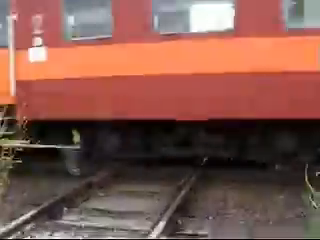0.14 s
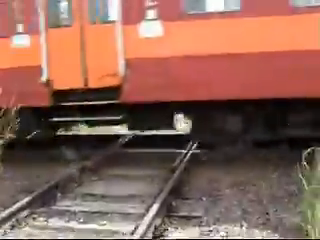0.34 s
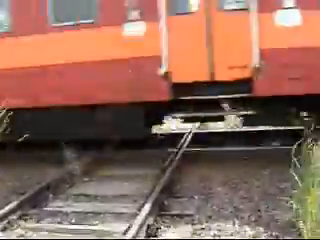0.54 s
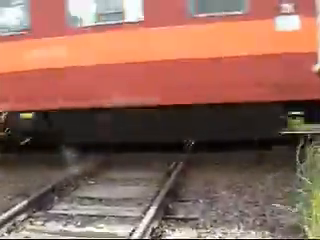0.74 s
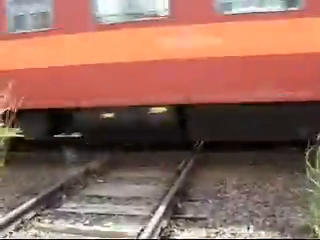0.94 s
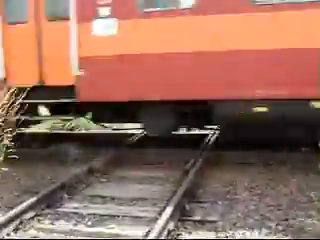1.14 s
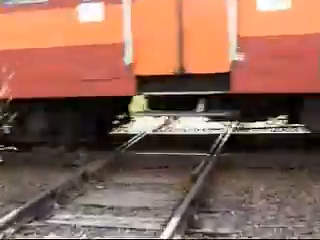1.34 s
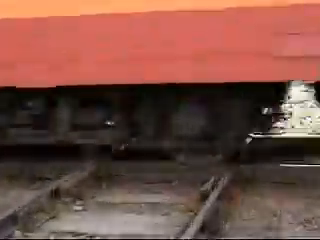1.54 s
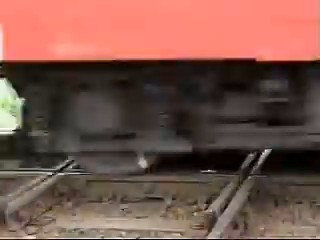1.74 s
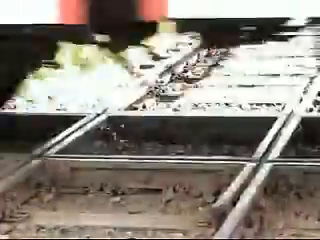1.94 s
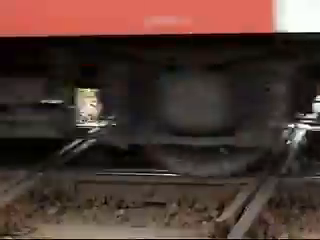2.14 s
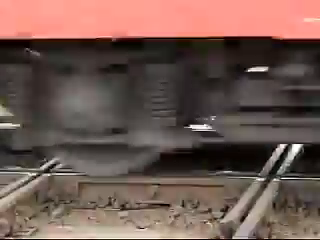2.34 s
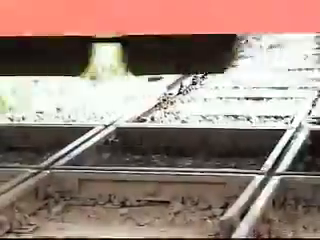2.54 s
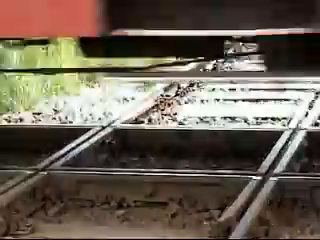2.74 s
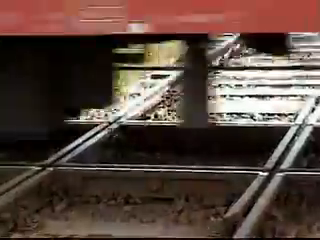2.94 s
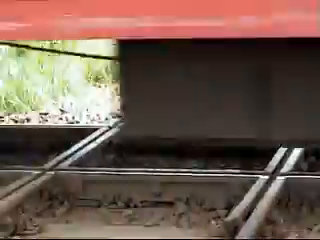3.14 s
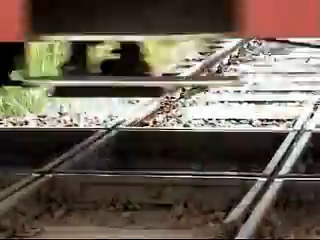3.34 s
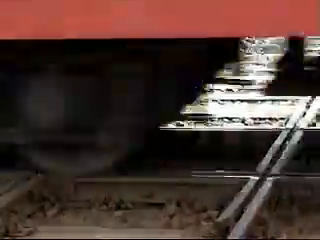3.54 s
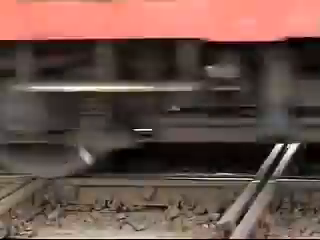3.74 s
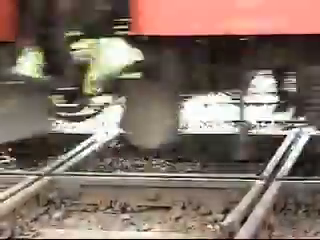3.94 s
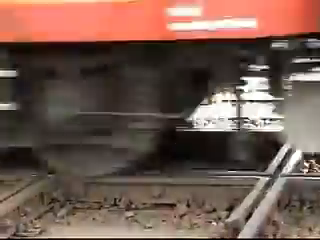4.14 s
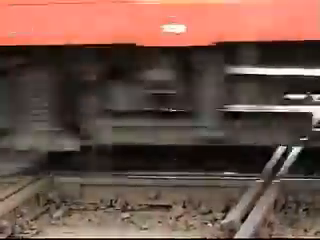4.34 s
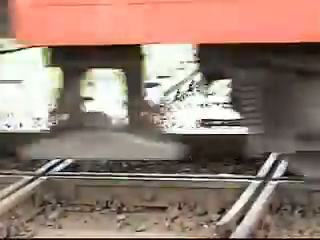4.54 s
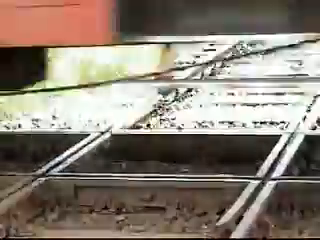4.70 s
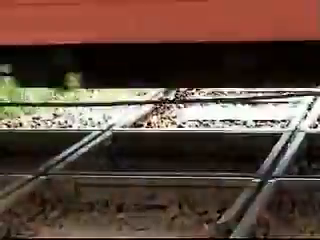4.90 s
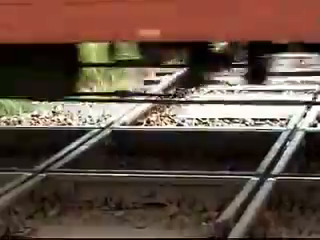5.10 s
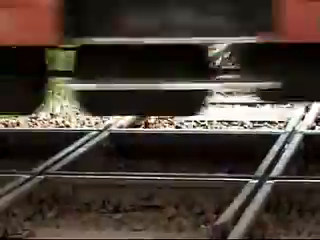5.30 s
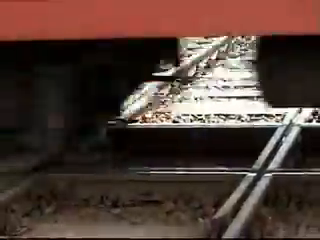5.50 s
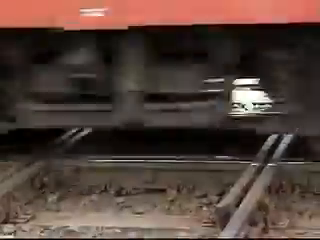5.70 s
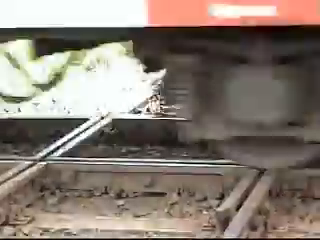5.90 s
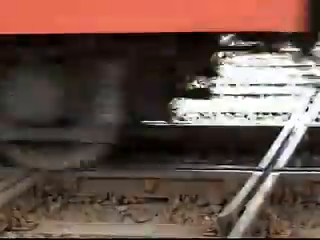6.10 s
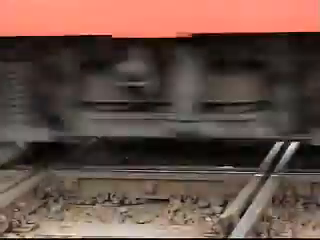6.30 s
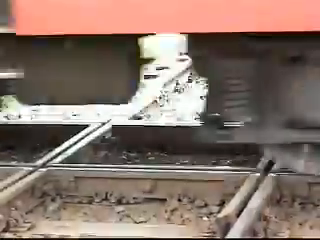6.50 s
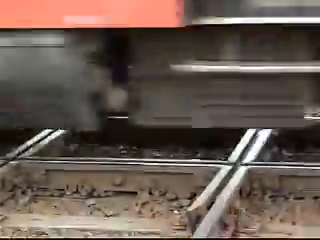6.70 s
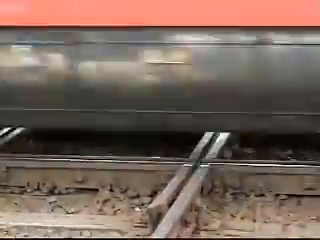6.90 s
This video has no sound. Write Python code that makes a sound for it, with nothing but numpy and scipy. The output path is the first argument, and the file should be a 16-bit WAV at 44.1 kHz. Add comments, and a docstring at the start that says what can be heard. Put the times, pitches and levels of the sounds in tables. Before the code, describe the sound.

Close to the track outdoors, passing passenger coaches make a continuous low rumble while the rails roar, swelling as each wheel nears. Groups of hard double knocks come about every two seconds as the wheels slam over crossed rails, each blow clanging and ringing briefly. Duller rail joint clonks surround them. Near the end, equipment under a coach hums for a moment as the clatter goes on.

```python
"""Rumble, roar and sharp steel knocks: an electric passenger train rolls over a nearby track crossing.
At each of two crossed rails, a wheel drops into a gap with a knock and a thud, slams onto the far edge
and rings on. Every bogie (a frame with two axles) also clonks over a rail joint before and after.
The rails roar as each wheel nears, the coaches rumble in between, and a short hum passes at the end."""
import sys
import numpy as np
from scipy import signal
from scipy.fft import rfft, irfft, next_fast_len
from scipy.io import wavfile
from scipy.ndimage import uniform_filter1d

SR = 44100
rng = np.random.default_rng(int(sys.argv[2]) if len(sys.argv) > 2 else 0)


def generate_wav(signal):
    """Clip the signal to [-1, 1] and save it as 16-bit WAV at the path in sys.argv[1]."""
    frames = np.transpose(np.atleast_2d(signal))
    scaled = np.clip(frames, -1, 1) * 32767
    pcm = np.round(scaled).astype(np.int16)
    wavfile.write(sys.argv[1], SR, pcm)


N = 306495

# One row per axle, a bogie's front and rear in turn: (time at gap 1 [s], time at gap 2 [s],
# knock 1 [dB], knock 2 [dB], flight over gap 1 [s], flight over gap 2 [s], clonk [dB], frame boom [dB],
# wheel ring [dB], fade time stretch [factor], ping pitch [Hz], ping level [dB], closest roar [dB])
AXLES = [(-0.085, 0.06, -12, -16, 0.014, 0.0086, -7, -21, -45, 1.17, 2610, -25, -27.5),
         (0.19, 0.335, -12, -8, 0.015, 0.006, -11, -15, -39, 0.99, 4005, -34, -32),
         (1.491, 1.628, -8.5, -16, 0.016, 0.008, -10, -10.5, -42, 1.08, 3460, -44, -28),
         (1.756, 1.899, -7, -5, 0.013, 0.002, -10.5, -18.5, -39, 1.12, 4010, -37, -30),
         (2.101, 2.237, -13, -6, 0.014, 0.010, -13, -23, -27.5, 1.07, 3680, -31, -34.5),
         (2.361, 2.502, -6.5, -7.5, 0.013, 0.009, -13, -23, -35, 1.1, 2713, -34, -34.5),
         (3.539, 3.673, -4.5, -9, 0.013, 0.010, -9.5, -17, -28, 1.08, 1776, -36, -33),
         (3.798, 3.937, -6, -3.5, 0.013, 0.009, -11.5, -24.5, -25.5, 1.08, 1965, -44, -30.5),
         (4.177, 4.314, -3.5, -9.5, 0.015, 0.005, -15.5, -17.5, -31, 1.18, 2530, -33, -32),
         (4.432, 4.569, -5, -9, 0.014, 0.009, -13, -20, -34, 1.31, 2440, -42, -35),
         (5.578, 5.712, -3.5, -9.5, 0.015, 0.010, -10.5, -19.5, -31, 1.08, 1780, -39, -30),
         (5.831, 5.967, -4, -8, 0.016, 0.006, -13, -20.5, -36, 1.1, 2035, -34.5, -29),
         (6.156, 6.289, -12, -4, 0.011, 0.012, -21, -18, -40, 0.52, 2690, -49, -33),
         (6.409, 6.541, -10, -8.5, 0.010, 0.006, -15.5, -9.5, -35.5, 0.72, 4020, -37, -31)]
# A wheel's modes, the notes it rings at: (pitch [Hz], width [Hz], relative level [dB])
WHEEL_MODES = [(1001, 2.5, 10.5), (1844, 11, -14), (1897, 4.8, 8), (2750, 36, -1), (2840, 25, -10),
               (3618, 65, -1), (3800, 19, 0.5), (4380, 28, -2.5), (4634, 35, -2.5), (6800, 20, -16.5),
               (7170, 30, -18.5)]
# What a blow shakes. A fade time is how long a sound takes to fall by 60 dB.
# The wheel's rim clacks: (pitch [Hz], relative level [dB per Hz], fade time [s])
CLACK_BANDS = [(450, 1.5, 0.15), (630, -9.5, 0.053), (820, 8.5, 0.15), (1260, -3, 0.19), (2190, -6.5, 0.16),
               (2870, -16, 0.17), (5370, -20.5, 0.14), (8300, -37.5, 0.21)]
# The bogie thuds: (pitch [Hz], relative level [dB per Hz], fade time [s])
THUD_BANDS = [(126, -18.5, 0.26), (175, -2.5, 0.084), (244, 4, 0.094), (332, -7.5, 0.2), (486, -8, 0.14),
              (690, -29.5, 0.067)]
# The sleepers, the beams under the rails, thump: (pitch [Hz], relative level [dB per Hz], fade time [s])
THUMP_BANDS = [(60, -15, .15), (88, -13.5, 0.095), (115, 3.5, 0.24), (148, -2, 0.11)]


def amp(db):
    """Turns decibels into a gain."""
    return 10 ** (np.asarray(db) / 20)


def unit_rms(x):
    """Scales a signal to an average (rms) level of 1."""
    return x / np.sqrt(np.mean(x ** 2, -1, keepdims=True) + 1e-20)


def curve_at(points, hz):
    """Joins (frequency, value) points on a log-frequency axis."""
    point_hz, value = np.transpose(points)
    return np.interp(np.log(hz + 1), np.log(point_hz + 1), value)


def add(mix, s, sound):
    """Mixes a sound in at s seconds, cutting off what falls outside the mix."""
    start = round(s * SR)
    sound = sound[..., max(-start, 0):]
    part = mix[:, max(start, 0):][:, :sound.shape[-1]]
    part += sound[..., :part.shape[1]]


def speed(s, start_m_per_s=10.0, gain_m_per_s2=0.125):
    """The train slowly gathers speed; gives metres per second at time s."""
    return start_m_per_s + gain_m_per_s2 * s


def restless_noise(spectrum, patch_db, flicker_db):
    """Shaped noise with drifting louder patches and a flicker shared by all pitches."""
    hz, _, cells = signal.stft(rng.standard_normal((2, N)), SR, nperseg=1024, noverlap=768)
    patches = uniform_filter1d(rng.standard_normal(cells.shape[1:]), size=4, axis=0)
    patches = unit_rms(uniform_filter1d(patches, size=14, axis=1))
    flicker = unit_rms(uniform_filter1d(rng.standard_normal(cells.shape[2]), size=6))
    cells = cells * amp(curve_at(spectrum, hz)[:, None] + patch_db * patches + flicker_db * flicker)
    return unit_rms(signal.istft(cells, nperseg=1024, noverlap=768)[1][:, :N])


def coach_rumble():
    """Rough wheel rims shake the coaches into a low rumble."""
    # The rumble's tone colour: (frequency [Hz], relative level [dB per Hz])
    spectrum = [(20, -40.5), (40, -17), (70, -23.5), (110, -11.5), (180, -0.5), (240, 1.5), (310, -4.5),
                (420, -5.5), (600, -28), (1200, -63)]
    # Its rise and fall: (time [s], level [dB])
    levels = [(0.0, -18.5), (0.21, -18.5), (0.52, -24.5), (1.26, -21.5), (1.57, -18.5), (1.93, -20),
              (2.34, -30.5), (2.9, -25), (3.56, -23.5), (5.13, -26), (5.69, -21), (6.41, -25), (6.95, -27)]
    level_db = np.interp(np.arange(N) / SR, *np.transpose(levels))
    return amp(level_db) * restless_noise(spectrum, patch_db=1.2, flicker_db=.8)


def rail_roar(distance_m=1.65, track_db=-37, fade_db_per_s=1):
    """The whole track roars, slowly fading, and swells as each wheel passes closest."""
    # The roar's tone colour: (frequency [Hz], relative level [dB per Hz])
    spectrum = [(250, -18.5), (500, 7.5), (650, 3.5), (950, 4.5), (1300, -2), (2000, -3), (2850, -6),
                (3400, -11), (4500, -14.5), (6000, -18.5), (8000, -27)]
    t = np.arange(N) / SR
    wheel_power = sum(amp(db) ** 2 / (1 + (speed(t) * (t - s) / distance_m) ** 2) for s, *_, db in AXLES)
    track_power = amp(track_db - fade_db_per_s * (t - t.mean())) ** 2
    return np.sqrt(track_power + wheel_power) * restless_noise(spectrum, patch_db=.9, flicker_db=.4)


def knock(hz, contact_s=0.0033, glide=0.54):
    """Wheel and rail meet like a spring: a few cycles that sag in pitch as the load lets go."""
    age = np.arange(SR // 20) / SR / contact_s
    cycles = np.cumsum(hz * (1 + glide * (np.exp(-age) - np.exp(-1)))) / SR
    envelope = age ** 3 * np.exp(3 * (1 - age))
    return envelope * np.sin(2 * np.pi * (cycles + rng.random()))


def blow(bands, rise_s, stretch=1, crack=0, crack_s=.002, size=10240):
    """A hit wakes a crowd of modes, each band fading at its own speed; crack boosts the start."""
    t, hz = np.arange(size) / SR, np.fft.rfftfreq(size, 1 / SR)
    uneven = unit_rms(uniform_filter1d(rng.standard_normal(len(hz)), size=7))  # some modes stand out
    noise = rfft(rng.standard_normal((2, size))) * amp(4 * np.clip(uneven, -2, 2))
    attack = (1 - np.exp(-(t / rise_s) ** 2)) * (1 + crack * np.exp(-t / crack_s))
    centres = [bands[0][0] / 2] + [band[0] for band in bands] + [bands[-1][0] * np.sqrt(2)]
    out = 0
    for k, (_, db, fade_s) in enumerate(bands):
        share = np.interp(hz, centres[k:k + 3], [0, 1, 0])
        band = irfft(noise * share) * attack * amp(-60 * t / (fade_s * max(stretch, .2)))
        out = out + amp(db) * np.linalg.norm(share) * unit_rms(band)
    return out / out[:, :SR // 50].std(1, keepdims=True)  # level 1 over the first 20 ms


def ring(modes, fade_s, detune, rise_s):
    """Struck steel rings: each mode is a wobbling cluster of close notes, retuned a little on every hit."""
    t, hz = np.arange(SR // 2) / SR, np.fft.rfftfreq(SR // 2, 1 / SR)
    tunings = 1 + detune * rng.standard_normal(len(modes))
    spectrum = sum(amp(db) * np.exp(-.5 * ((hz - pitch * tuning) / width) ** 2)
                   for (pitch, width, db), tuning in zip(modes, tunings))
    notes = irfft(spectrum * np.exp(2j * np.pi * rng.random((2, len(hz)))))
    envelope = (1 - np.exp(-t / rise_s)) * amp(-60 * t / max(fade_s, .05))
    return unit_rms(notes * envelope) * np.sqrt(np.mean(envelope ** 2))


def joint_clonk(s, db):
    """A wheel clonks dully over a joint further off and rings a little. Gives (time, sound) pairs."""
    return [(s - .001, amp(db - 6.5) * knock(hz=810, contact_s=0.0024, glide=0.4)),
            (s - .0015, amp(db - 8.5) * blow(CLACK_BANDS, rise_s=0.00068, crack=0.39, crack_s=0.019)),
            (s - .001, amp(db - 4.5) * blow(THUD_BANDS, rise_s=0.0024)),
            (s - .001, amp(db - 17.5) * blow(THUMP_BANDS, rise_s=0.0063)),
            (s, amp(db - 24.5) * ring(WHEEL_MODES, fade_s=0.35, detune=0.015, rise_s=0.0051))]


def gap_drop(s, knock_db, gap):
    """A wheel clacks off the edge into a gap: the rail knocks, the bogie thuds and hums, sleepers thump."""
    # The notes of the bogie's frame: (pitch [Hz], width [Hz], relative level [dB])
    frame_modes = [(111, 7.6, -6), (256.5, 8.6, 0.5), (287.8, 5.7, -1), (360.6, 8.7, -1), (368.4, 6.1, -16)]
    knock_hz, thud_db, hum_db, thump_db, *_ = gap
    return [(s - .001, amp(knock_db) * knock(knock_hz)),
            (s - .005, amp(thud_db - 9.5) * blow(CLACK_BANDS, rise_s=0.0035)),
            (s - .002, amp(thud_db) * blow(THUD_BANDS, rise_s=0.0043)),
            (s, amp(hum_db) * ring(frame_modes, fade_s=0.47, detune=0.015, rise_s=0.0079)),
            (s - .003, amp(thump_db) * blow(THUMP_BANDS, rise_s=0.0032))]


def edge_strike(s, ring_db, stretch, gap):
    """Steel meets steel at the gap's far edge: a scuff, a sharp crash, a rail clang and a wheel ring."""
    # The bright crash of steel: (pitch [Hz], relative level [dB per Hz], fade time before stretch [s])
    crash_bands = [(1190, 8.5, 0.096), (1460, 1, 0.35), (2267, 7.5, 0.13), (2130, -1, 0.14),
                   (2810, 1.5, 0.24), (3350, -7, 0.66), (3490, 0.5, 0.28), (4880, -4.5, 0.24),
                   (5960, -8, 0.3), (7520, -9.5, 0.3), (7680, -22, 0.091)]
    # The rail's clang: (pitch [Hz], relative level [dB per Hz], fade time before stretch [s])
    clang_bands = [(333, -6, 0.27), (480, 2, 0.073), (600, 1, 0.074), (770, 5, 0.21), (860, 8, 0.16),
                   (1110, -12, 0.14), (1250, -16.5, 0.2), (1600, -5.5, 0.32)]
    *_, crash_db, clang_db, ring_offset_db = gap
    scuff = blow(crash_bands, rise_s=0.0061, stretch=.4)
    crash = blow(crash_bands, rise_s=0.0017, stretch=stretch, crack=0.48, crack_s=0.00062)
    clang = blow(clang_bands, rise_s=0.0015, stretch=stretch)
    wheel = ring(WHEEL_MODES, fade_s=.5 * stretch, detune=0.012, rise_s=0.0023)
    return [(s - .0063, amp(crash_db - 1) * scuff),
            (s - .001, amp(crash_db) * crash),
            (s - .003, amp(clang_db) * clang),
            (s, amp(ring_db + ring_offset_db) * wheel)]


def sing(middle_s, length_s, hz, db, waver=0.0053):
    """One wavering note swells and fades. Gives (start time, sound)."""
    size = int(length_s * SR)
    drift = unit_rms(uniform_filter1d(rng.standard_normal(SR), size=300))[:size]
    tone = np.sqrt(2) * np.sin(2 * np.pi * np.cumsum(hz * (1 + waver * drift)) / SR)
    return middle_s - length_s / 2, amp(db) * np.hanning(size) * tone


def passing_axles(joint_before_m=1.31, joint_after_m=3.06):
    """Every axle hits both gaps; a bogie's front one clonks on the joint before, its rear one after."""
    # The gaps at the two crossed rails: (knock pitch [Hz], thud [dB], bogie hum [dB],
    # sleeper thump [dB], crash [dB], clang [dB], added to the wheel ring [dB])
    gaps = [(1066, -13.5, -17.5, -29.5, -20.5, -17, 1.5), (861, -11, -19.5, -30, -21, -17, -1)]
    out = np.zeros((2, N))
    for k, axle in enumerate(AXLES):
        (first_s, second_s, first_db, second_db, first_flight_s, second_flight_s,
         clonk_db, boom_db, ring_db, stretch, ping_hz, ping_db, _) = axle
        joint_m = joint_after_m if k % 2 else -joint_before_m  # counted from the first gap
        sounds = joint_clonk(first_s + joint_m / speed(first_s), clonk_db)
        sounds += gap_drop(first_s, first_db, gaps[0])
        sounds += edge_strike(first_s + first_flight_s, ring_db, stretch, gaps[0])
        sounds += gap_drop(second_s, second_db, gaps[1])
        sounds += edge_strike(second_s + second_flight_s, ring_db, stretch, gaps[1])
        sounds += [sing(first_s + .048, length_s=.08, hz=250.4, db=boom_db),  # the bogie's frame booms
                   sing(first_s + .062, length_s=.11, hz=ping_hz, db=ping_db),  # the wheel pings
                   sing(second_s + .062, length_s=.19, hz=2010, db=-41)]  # the second rail sings on
        for s, sound in sounds:
            add(out, s, sound)
    return out


def equipment_hum():
    """Equipment under the last coach hums as it goes by."""
    out = np.zeros((2, N))
    add(out, *sing(middle_s=6.84, length_s=.25, hz=495, db=-28.5))
    return out


def microphone_pair(sound):
    """Two close microphone openings share one sound; a second, scattered one sets left and right apart."""
    # How alike the two sides are: (frequency [Hz], likeness [0 to 1])
    likeness = [(25, 0.94), (60, 1), (130, 0.99), (270, 1), (530, 0.9), (910, .96), (1600, 0.81),
                (2700, 0.86), (4600, 0.64), (8000, 0.88)]
    # How much louder the left is: (frequency [Hz], left minus right [dB])
    balance = [(200, 0), (390, .5), (570, -3), (850, -2), (1250, -4), (1800, -4.5), (2600, -5),
               (3700, -3.5), (5500, 1.5), (8000, 1)]
    # How far the left wave runs ahead: (frequency [Hz], lead [radians])
    lead = [(0, -0.5), (520, 0.11), (4050, 0.4), (8180, -0.1)]
    size = next_fast_len(N)
    hz = np.fft.rfftfreq(size, 1 / SR)
    shared, scattered = rfft(sound, size)
    alike = np.clip(curve_at(likeness, hz), 0, 1)
    mid = np.sqrt((1 + alike) / 2) * shared
    side = np.sqrt((1 - alike) / 2) * scattered
    lean = amp(curve_at(balance, hz) / 2) * np.exp(1j * curve_at(lead, hz) / 2)
    return irfft(np.array([(mid + side) * lean, (mid - side) / lean]), size)[:, :N]


def scene():
    """The whole train, heard from beside the track."""
    return microphone_pair(coach_rumble() + rail_roar() + passing_axles() + equipment_hum())


def record(dry):
    """The microphone thins the deep bass, overload rounds the loudest blows, and the top treble is cut."""
    low_cut_hz, high_cut_hz, ceiling = 45, 8050, 1.05
    thinned = signal.lfilter(*signal.butter(1, low_cut_hz, "high", fs=SR), dry)
    rounded = thinned / (1 + (thinned / ceiling) ** 4) ** (1 / 4)
    treble_cut = signal.firwin(255, high_cut_hz, window=("kaiser", 9), fs=SR)
    return signal.oaconvolve(rounded, treble_cut[None], "same")


dry = scene()
out = record(dry)
generate_wav(out)
```